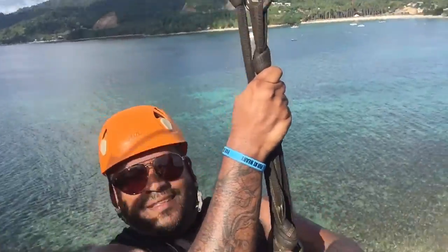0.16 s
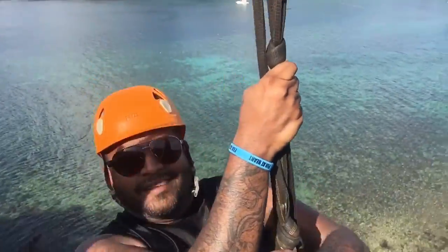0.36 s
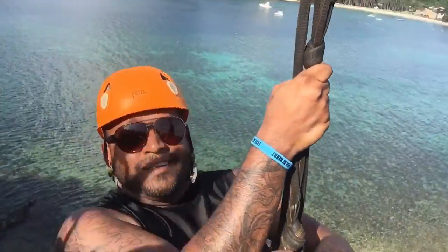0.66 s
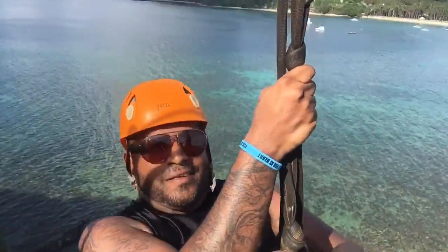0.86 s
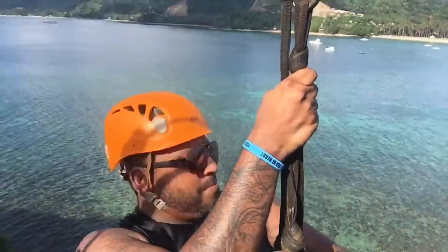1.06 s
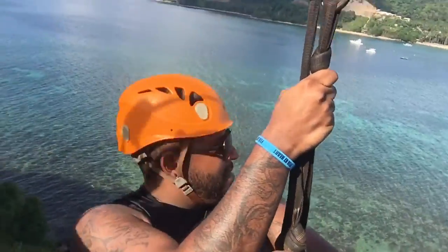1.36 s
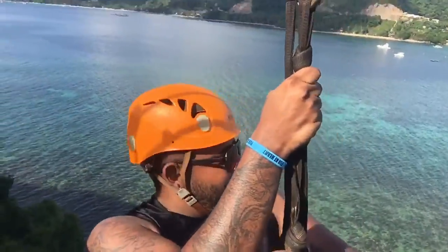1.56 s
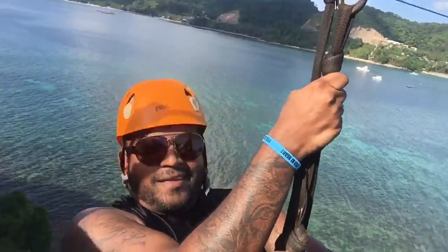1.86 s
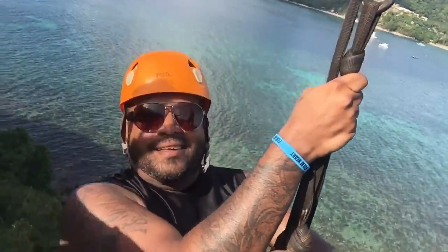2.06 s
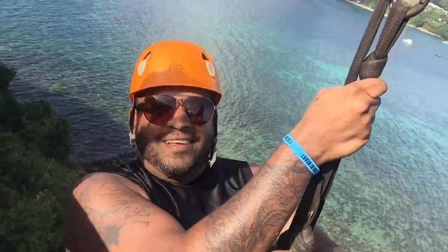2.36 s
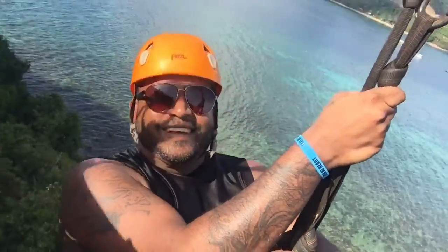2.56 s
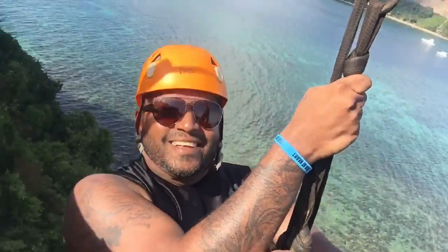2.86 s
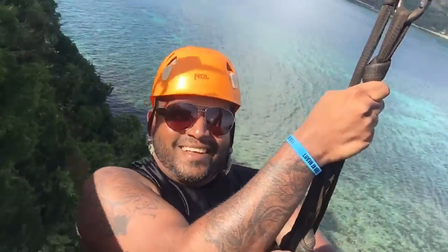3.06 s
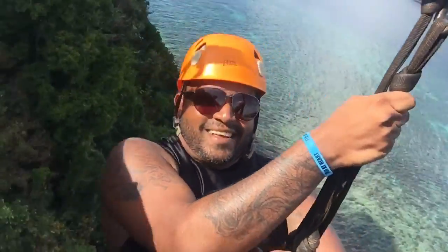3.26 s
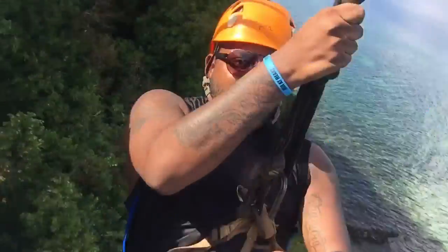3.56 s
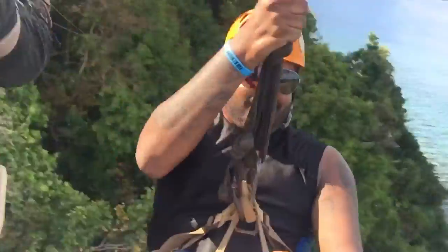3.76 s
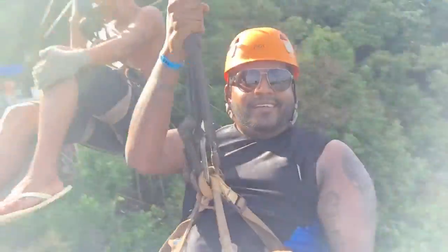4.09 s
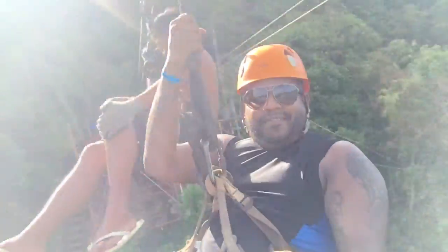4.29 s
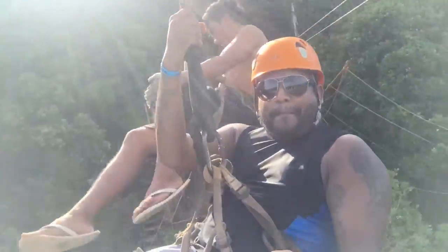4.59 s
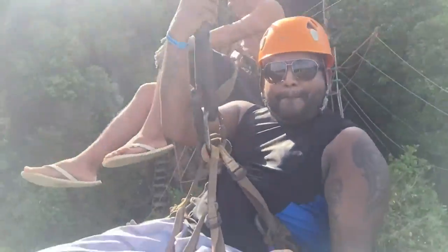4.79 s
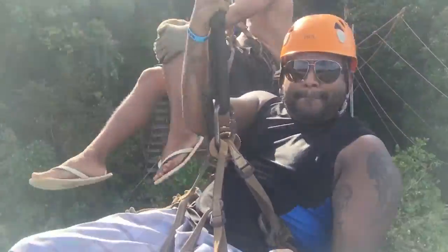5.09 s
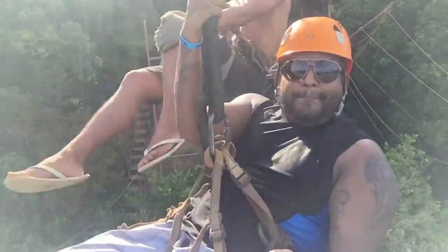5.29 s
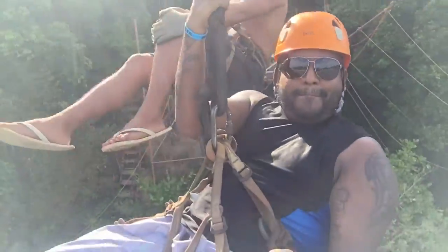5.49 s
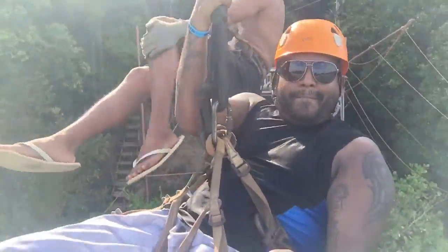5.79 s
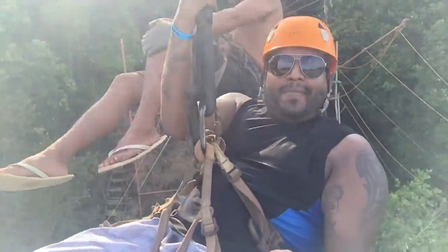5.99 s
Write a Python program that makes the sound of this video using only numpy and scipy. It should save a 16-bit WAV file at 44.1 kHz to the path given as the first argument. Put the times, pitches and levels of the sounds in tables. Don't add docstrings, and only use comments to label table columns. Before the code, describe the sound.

Steel zip line wheels race along a twisted cable with a loud, gritty, ringing buzz, clattering hard midway, then turning duller over faint wind.

```python
import sys
import numpy as np
from scipy import signal
from scipy.fft import rfft, irfft
from scipy.io import wavfile
from scipy.ndimage import uniform_filter1d

SR = 44100
rng = np.random.default_rng(int(sys.argv[2]) if len(sys.argv) > 2 else 0)


def how_loud(loudness_db):
    steps = np.asarray(loudness_db, float) / 20
    return 10 ** steps


def log_audio(samples):
    frames = np.atleast_2d(samples).T
    limited = np.clip(frames, -1, 1)
    pcm = np.round(limited * 32767).astype(np.int16)
    wavfile.write(sys.argv[1], SR, pcm)


N = 270581
T = np.arange(N) / SR

DRONE_HZ = 28.13
DRONE_LINES = [(2, -72), (5, -66), (6, -59.5), (7, -71), (8, -69), (9, -64.5), (10, -68), (11, -69),
               (12, -65), (14, -65)]
# (time [s], length [s], frequency [Hz], width [Hz], level [dB])
ROPE_MOANS = [(2.14, 0.16, 253, 12, -49.5), (3.4, 0.073, 660, 56, -53), (5, 1, 633, 42, -48.5),
              (6.06, 0.095, 616, 38, -40), (4.53, 0.32, 436, 25, -48.5), (5.9, 0.74, 431, 28.7, -48),
              (0.74, 0.7, 176, 18, -57), (2.5, .6, 193, 23, -58.5)]
# (frequency [Hz], density [dB/Hz])
WIND_SPECTRUM = [(59, -45), (100, -17), (113, -21.5), (161, -5), (194, -12.5), (244, -9), (495, -8.5),
                 (553, -7), (900, -6.5), (1170, -6), (1980, -120)]
WIND_DB = -43
# (frequency [Hz], density [dB/Hz])
RUMBLE_SPECTRUM = [(15, -38), (25, -14), (54, 1), (70, 3.5), (112, -7), (130, -2), (170, -33), (290, -120)]
# (time [s], level over calm [dB])
GUSTS = [(0.0, 5), (.2, 0), (1.15, 5), (1.4, 4), (1.75, 7), (2.0, 6), (2.2, 3), (2.48, 6), (2.72, 8),
         (3.27, 7), (3.0, 2), (3.87, 1.5), (4.23, 4), (4.4, 7), (4.55, 5), (4.78, 6), (5.12, 7), (5.27, 8),
         (5.66, 4), (5.94, 6)]
CALM_DB, GUST_S = -57.5, 0.05
# (time [s], frequency [Hz], peak [dB])
MIC_THUMPS = [(1.14, 92, -43), (1.2, 55, -46), (5.28, 62, -47), (5.312, 120, -40), (5.311, 200, -42),
              (1.13, 170, -48), (1.55, 180, -40), (.77, 170, -42), (5.63, 52, -48), (5.93, 51, -46)]
# (time [s], peak [dB])
KNOCKS = [(3.4461, -5), (3.4654, -5), (3.4854, -8), (3.5473, -5), (3.5892, -2), (3.6296, -4), (3.6656, -6),
          (3.7384, -8), (3.7718, -8), (3.7854, -9), (3.8044, -11), (3.8312, -6), (3.8626, -7), (3.8774, -5),
          (3.8964, -7), (3.902, -5), (3.9144, -8)]
KNOCK_HZ, KNOCK_RISE_S, KNOCK_T60_S, KNOCK_DB = 3760, 0.0005, 0.01, -0.5
# (time [s], rate [strands/s])
STRAND_RATE = [(0, 172), (.8, 168), (1.1, 162), (2, 164), (2.6, 164), (3.1, 160), (3.7, 157), (4.2, 152),
               (4.8, 162), (5.3, 160), (6.14, 150)]
# (time [s], turn [0-1])
RIDER_TURN = [(0, 0.13), (3.6, 0), (4.0, 0), (4.4, 0.68), (6.14, 0.66)]
# (time [s], length [s], wheel change [dB], plate change [dB], wire change [dB])
JOLTS = [(0.034, .05, -.7, -2.5, 0), (.25, .08, 0.2, 1.2, 1.5), (.43, 0.046, 0.5, .3, -.7),
         (0.715, .06, -1.2, 1, -1.5), (0.933, 0.041, 0.6, 0.5, 1), (1.098, 0.041, -1.5, -2, -1),
         (1.353, 0.044, -0.1, -3, 1), (1.53, .07, 1.4, 1, 0), (1.78, 0.11, -0.2, -3, 0.5),
         (2.388, 0.031, -1.7, -2, -2), (2.88, 0.042, 1.3, 2.5, 1.2), (3.067, 0.043, -2, -3, -3),
         (3.197, .05, 1.1, -1.5, 1), (3.468, 0.15, 2.5, -2.5, 0.5), (3.719, .05, -2, -2.5, -6.5),
         (3.912, 0.044, 0.2, -1.5, 0.5), (4.2, .05, 1.5, .3, 0), (4.35, .07, -3, -2.2, -4),
         (4.823, 0.036, 2, -1, 2), (5.05, 0.033, -1.5, -3, -1), (5.3, .06, -0.3, 1.5, 0),
         (5.522, 0.097, 1.7, 1, 0.8), (5.723, .06, -0.9, -1.5, -2.2)]
# (frequency [Hz], density [dB/Hz])
GRIND_FACING = [(350, -71), (600, -21.5), (824, -20), (998, -14), (1760, -2.5), (2510, -3), (3040, -1),
                (3230, -2.5), (3500, 0), (4550, -24), (7700, -120)]
# (frequency [Hz], density [dB/Hz])
GRIND_AWAY = [(470, -33), (800, -29), (882, -40), (1070, -11.5), (1260, -15), (1850, -14), (2220, -13),
              (2690, -5.5), (3690, 3.5), (4800, -8.5), (6240, -28), (10600, -120)]
# (frequency [Hz], density [dB/Hz])
PLATE_SPECTRUM = [(2880, -24), (4900, -3.5), (5520, -2), (6080, -4.5), (6640, -1.5), (7600, -9),
                  (8000, -10), (10400, -21), (17600, -120)]
# (frequency [Hz], density [dB/Hz])
FIZZ_SPECTRUM = [(4470, -5.5), (7600, -1.5), (9730, -1), (10500, -4), (11400, -4), (13600, -9.5),
                 (15000, -10), (15500, -10), (16500, -15)]
# (frequency [Hz], width [Hz], level [dB])
LOW_WHEEL_MODES = [(3486, 400, -11.5), (3792, 193, 0.5), (3995, 270, -7)]
# (frequency [Hz], width [Hz], level [dB])
HIGH_WHEEL_MODES = [(4270, 346, -0.68), (4443, 397, -2.3)]
# (frequency [Hz], width [Hz], level [dB])
HUB_MODES = [(5745, 240, 0), (5330, 320, -6)]
# (time [s], length [s], peak [dB], steady [dB])
HUB_SWELL = (3.54, .11, -25.5, -39)
# (in view [dB], shaded [dB], shaded at [s], over [s], bounce [dB])
GRIND_LEVEL = (-21.5, -27, 4.16, .16, 0.1)
PLATE_LEVEL = (-23.5, -26.5, 4.5, 0.4, 0.56)
FIZZ_LEVEL = (-29.5, -33, 4.5, .1, 0.1)
LOW_WHEEL_LEVEL = (-19.5, -31.5, 4, 0.73, 2)
HIGH_WHEEL_LEVEL = (-19.5, -30.5, 3.5, 0.5, -0.3)
# (time [s], length [s], frequency [Hz], width [Hz],
# change [dB])
BAND_CHANGES = [(.15, 0.089, 12200, 600, 2), (.45, .3, 11300, 400, -1.5), (2.102, .1, 9800, 500, 1.5),
                (2.25, .2, 12600, 300, -2), (2.85, .08, 11400, 400, 1), (3.3, 0.24, 13000, 800, 2),
                (6.37, 0.76, 4040, 100, 0.5), (5.5, 1.5, 2670, 83, 4), (9.8, 0.47, 2900, 180, -1),
                (4.08, 0.088, 1500, 470, -5), (3.9, .04, 12500, 900, 5), (3.46, 0.092, 9340, 480, 6.5),
                (3.33, 0.19, 7800, 500, -3), (3.1, 0.053, 13000, 800, 2), (4.18, 0.11, 6900, 330, 1),
                (5.3, .12, 13000, 700, 3), (5.33, 0.11, 8100, 300, 4), (1.67, 0.11, 7600, 520, -4),
                (4.8, 0.78, 10900, 600, -2.5), (1.1, 2.9, 4950, 60, -8), (3.63, 0.059, 3830, 87, -2),
                (5.6, 0.039, 4600, 840, -1.5)]
BOUNCE_S, HEAVIEST_S = 0.66, 0.24
EDGE_HZ = 15745


def evened(x):
    return x / np.sqrt(np.mean(x ** 2) + 1e-20)


def bell(v, centre, width):
    return np.exp(-0.5 * ((v - centre) / width) ** 2)


def curve(rows):
    s, value = np.transpose(rows)
    return np.interp(T, s, value)


def swells(rows):
    t = T[::64]
    total = sum(np.outer(db, bell(t, s, long)) for s, long, *db in rows)
    return [np.interp(T, t, c) for c in total]


def noise():
    return rng.standard_normal(N)


def chance(slow_hz, fast_hz):
    hz = np.fft.rfftfreq(N, 1 / SR)
    shape = 1 / np.sqrt(hz + slow_hz) / (1 + (hz / fast_hz) ** 4)
    shape = shape * (hz > slow_hz / 2)
    return evened(irfft(rfft(noise()) * shape, N))


def coloured(x, points):
    f, db = np.transpose(points)
    hz = np.fft.rfftfreq(N, 1 / SR)
    shape_db = np.interp(np.log(hz + 1), np.log(f + 1), db, -90, -90)
    return evened(irfft(rfft(x) * how_loud(shape_db), N))


def resonate(x, hz, width_hz):
    turn = np.exp(2j * np.pi * np.cumsum(hz * np.ones(N)) / SR)
    r = np.exp(-np.pi * width_hz / SR)
    return 2 * (turn * signal.lfilter([1 - r], [1, -r], x / turn)).real


def drone():
    turns = np.cumsum(DRONE_HZ * (1 + 0.0028 * chance(0.5, 3.5))) / SR
    lines = np.zeros(N)
    for multiple, db in DRONE_LINES:
        fade = how_loud(db + 1.2 * chance(0.5, 3.7))
        lines += fade * np.sin(2 * np.pi * (multiple * turns + rng.random()))
    return how_loud(1.0 + 6.3 * curve(RIDER_TURN)) * lines


def cable():
    moans = np.zeros(N)
    for s, long, hz, width_hz, db in ROPE_MOANS:
        moans += how_loud(db) * bell(T, s, long) * evened(resonate(noise(), hz, width_hz))
    return moans


def wind():
    rush = how_loud(WIND_DB + 0.1 + 0.92 * chance(1.2, 15)) * coloured(noise(), WIND_SPECTRUM)
    gust_db = swells((s, GUST_S, db) for s, db in GUSTS)[0]
    rumble = how_loud(CALM_DB + gust_db) * coloured(noise(), RUMBLE_SPECTRUM)
    thumps = np.zeros(N)
    for s, hz, db in MIC_THUMPS:
        thumps += how_loud(db) * bell(T, s, 0.84 / hz) * np.sin(2 * np.pi * hz * (T - s))
    return rush + rumble + thumps


def knocks():
    t, train = np.arange(1000) / SR, np.zeros(N)
    envelope = (1 - np.exp(-t / KNOCK_RISE_S)) * how_loud(-60 * t / KNOCK_T60_S)
    ring = envelope * np.sin(2 * np.pi * KNOCK_HZ * t)
    for s, db in KNOCKS:
        train[round(s * SR)] = how_loud(db + KNOCK_DB)
    return signal.oaconvolve(train, ring / ring.max())[:N]


def strand_beat(jitter=0.045, uneven_db=2.5, crest=0.21):
    turns = np.cumsum(curve(STRAND_RATE) * (1 + jitter * chance(6.7, 61))) / SR
    strand_db = uneven_db * np.clip(rng.standard_normal(2000), -2, 1.7)
    strength = how_loud(strand_db)[turns.astype(int)]
    on_top = np.diff(np.round(turns), prepend=0) > 0
    blows = strength * on_top * rng.choice([-1.0, 1.0], N)
    return evened(strength * bell(turns % 1, 0.51, crest)), evened(blows)


def contact(beat, shake, beat_share, shake_db, own_db, grit):
    tick_db = 3.6 * np.minimum(rng.exponential(1, N), 3.5)
    ticks = (rng.random(N) < 1500 / SR) * noise() * how_loud(tick_db)
    rub = noise() + grit * evened(ticks)
    return rub * (1 + beat_share * beat) * how_loud(shake_db * shake + own_db * chance(25, 240))


def part_db(level, jolt_db):
    seen_db, shaded_db, s, long, bounce_db = level
    shade = 0.5 + 0.5 * np.tanh((T - s) / long)
    bounce = np.cos(2 * np.pi * (T - HEAVIEST_S) / BOUNCE_S)
    return seen_db + (shaded_db - seen_db) * shade + bounce_db * bounce + jolt_db


def grind(beat, blows, shake, turn, wheels_db):
    rub = evened(contact(beat, shake, 0.26, 0.36, 0.77, 0.37)) + 0.14 * blows
    tone = (1 - turn) * coloured(rub, GRIND_FACING) + turn * coloured(rub, GRIND_AWAY)
    return how_loud(part_db(GRIND_LEVEL, 1.22 * wheels_db) + 1.81 + 2.87 * turn) * tone


def wheel(knock, modes):
    total = np.zeros(N)
    for k, (hz, width_hz, db) in enumerate(modes):
        total += (-1) ** k * how_loud(db) * resonate(resonate(knock, hz, width_hz), hz, width_hz)
    return evened(total)


def ringing_wheels(beat, blows, shake, turn, wheels_db):
    knock = evened(contact(beat, shake, 0.91, 0.49, 0.5, 0.45)) + 0.62 * blows
    knock = knock * how_loud(-0.9 - 3.3 * turn)
    low = how_loud(part_db(LOW_WHEEL_LEVEL, 0.63 * wheels_db)) * wheel(knock, LOW_WHEEL_MODES)
    high = how_loud(part_db(HIGH_WHEEL_LEVEL, 0.66 * wheels_db)) * wheel(knock, HIGH_WHEEL_MODES)
    s, long, peak_db, steady_db = HUB_SWELL
    hub = (how_loud(steady_db) + how_loud(peak_db) * bell(T, s, long)) * wheel(knock, HUB_MODES)
    return how_loud(-2.3 * turn) * (low - high) + hub


def side_plates(beat, blows, shake, turn, plates_db):
    rattle = contact(beat * (0.94 + turn), shake, 0.38, 0.68, 0.72, 0.68) + 0.44 * turn * blows
    return how_loud(part_db(PLATE_LEVEL, plates_db)) * coloured(rattle, PLATE_SPECTRUM)


def wire_fizz(beat, shake, wires_db):
    hiss = coloured(contact(beat, shake, 0.19, 0.73, 1.13, 0.42), FIZZ_SPECTRUM)
    return how_loud(part_db(FIZZ_LEVEL, wires_db) + 1.46 + 0.45 * chance(3.4, 25)) * hiss


def beamed(x, patchy_db=1.5):
    hz, t, z = signal.stft(x, SR, nperseg=512, noverlap=384)
    patches = rng.standard_normal(z.shape[::-1])
    for _ in range(2):
        patches = uniform_filter1d(uniform_filter1d(patches, 45, 0), 6, 1)
    db = patchy_db * evened(patches).T * np.clip(hz / 9000, 0.3, 1)[:, None]
    for s, long, f, width_hz, change_db in BAND_CHANGES:
        db = db + change_db * np.outer(bell(hz, f, width_hz), bell(t, s, long))
    return signal.istft(z * how_loud(db), SR, nperseg=512, noverlap=384)[1][:N]


def trolley():
    beat, blows = strand_beat()
    shake = chance(25, 200)
    turn = np.clip(curve(RIDER_TURN), 0, 1)
    wheels_db, plates_db, wires_db = swells(JOLTS)
    parts = grind(beat, blows, shake, turn, wheels_db)
    parts = parts + ringing_wheels(beat, blows, shake, turn, wheels_db)
    parts = parts + side_plates(beat, blows, shake, turn, plates_db)
    parts = parts + wire_fizz(beat, shake, wires_db)
    return beamed(parts)


def scene():
    return (drone() + cable() + wind() + knocks() + trolley())[None]


def top_cut(x):
    return signal.sosfilt(signal.butter(12, 15980, fs=SR, output="sos"), x)


def record(dry):
    rounded = dry / (1 + np.abs(dry) ** 10) ** (1 / 10)
    lowpass = signal.firwin(2047, EDGE_HZ, window=("kaiser", 9), fs=SR)
    limited = signal.oaconvolve(rounded, lowpass[None], "same")
    return top_cut(limited)


dry = scene()
out = record(dry)
log_audio(out)
```